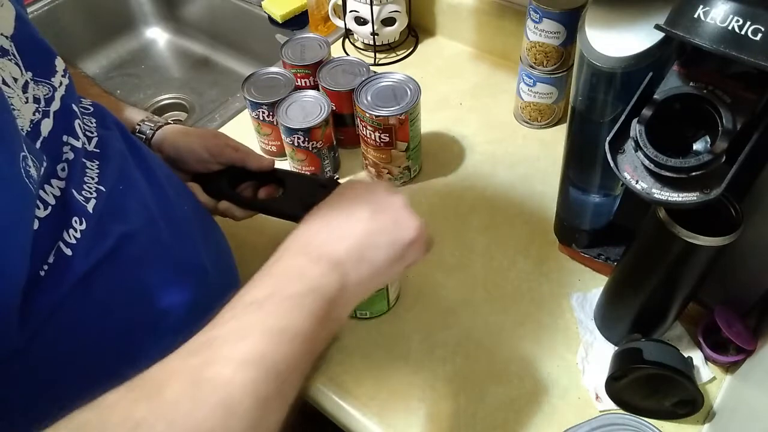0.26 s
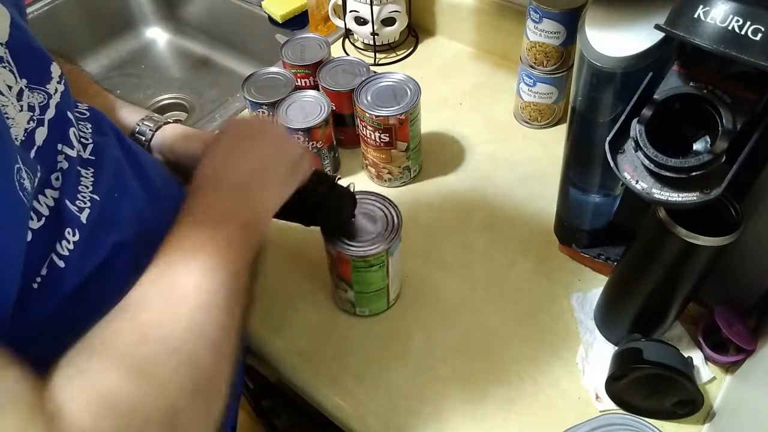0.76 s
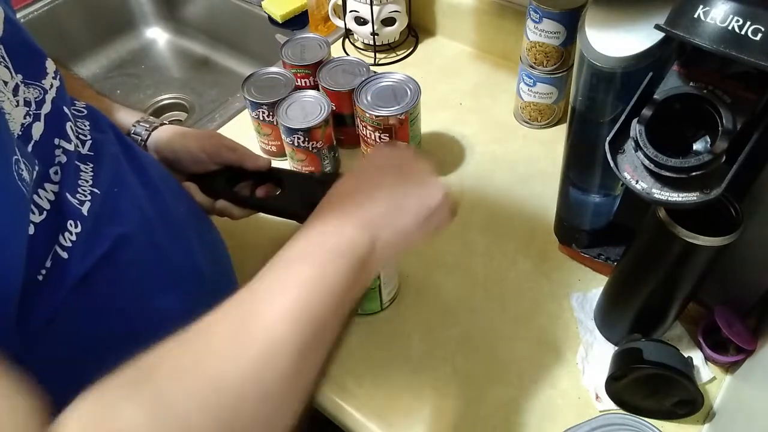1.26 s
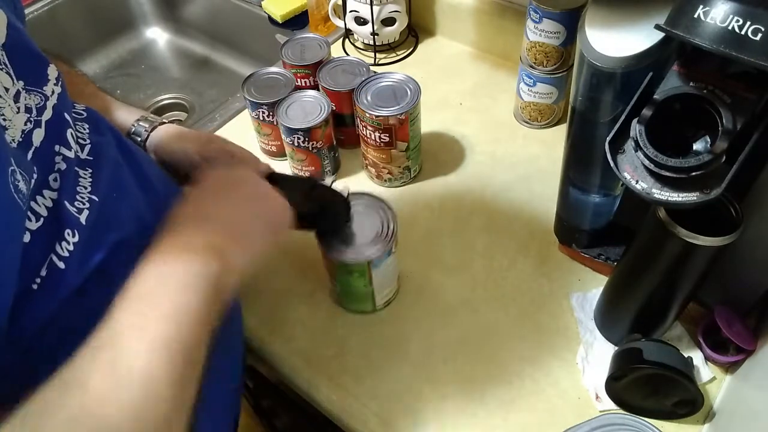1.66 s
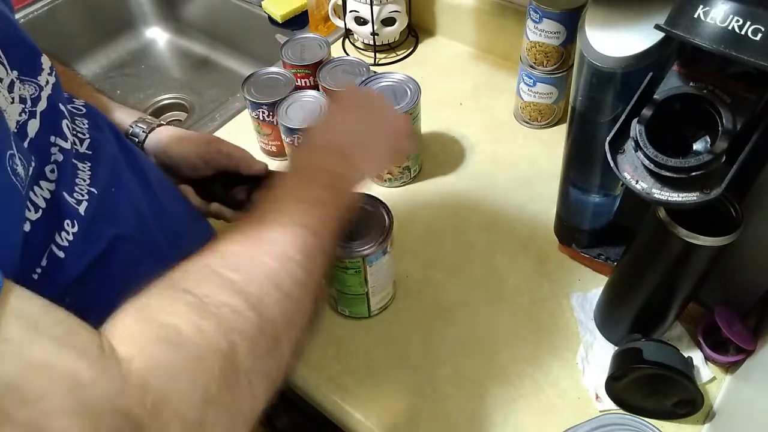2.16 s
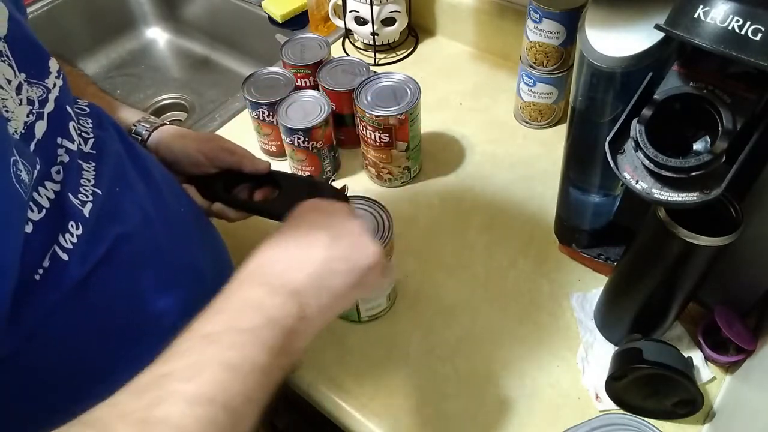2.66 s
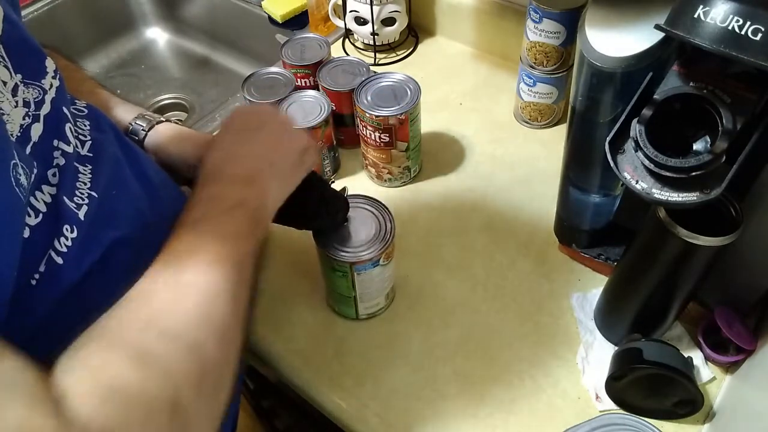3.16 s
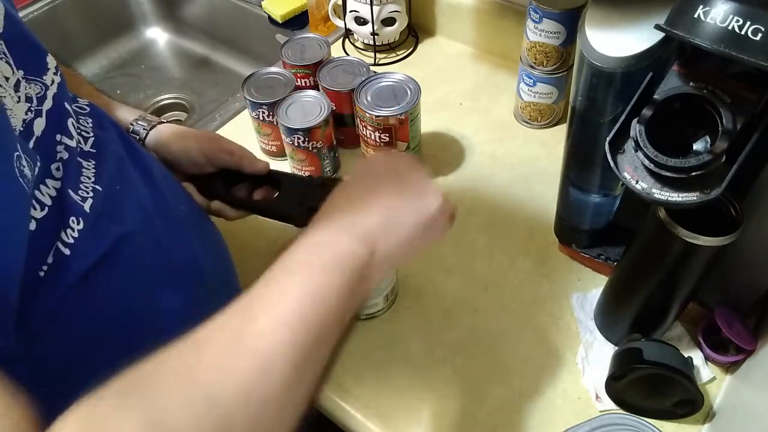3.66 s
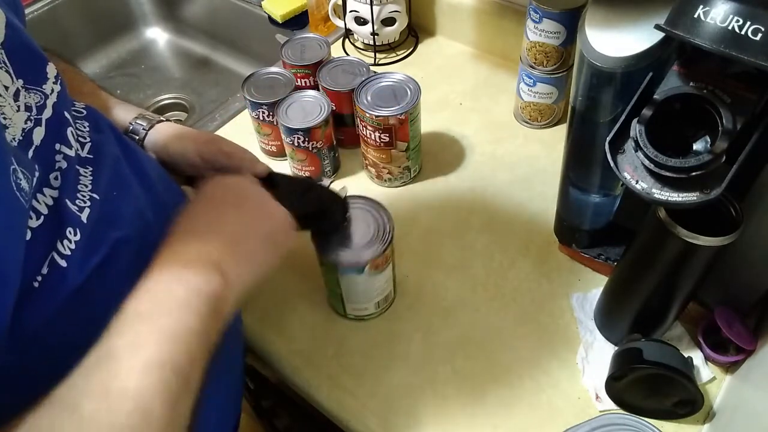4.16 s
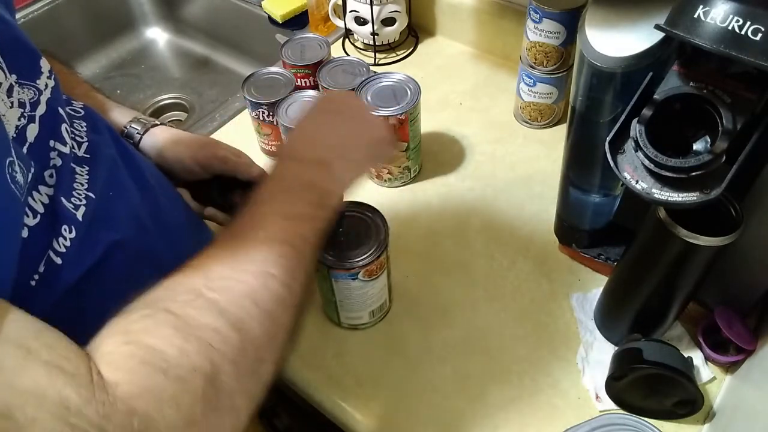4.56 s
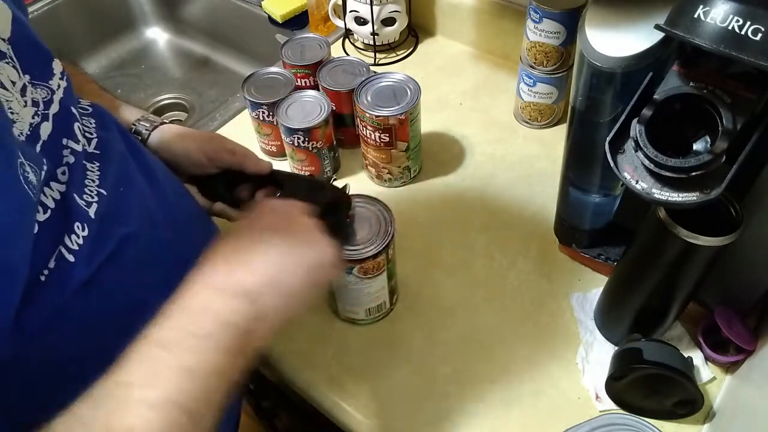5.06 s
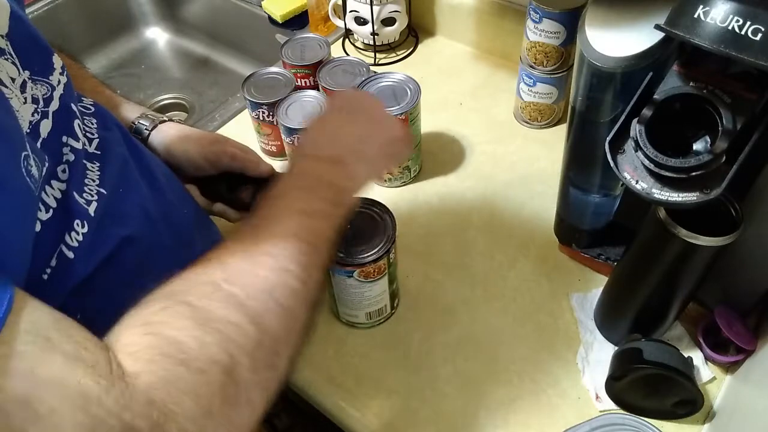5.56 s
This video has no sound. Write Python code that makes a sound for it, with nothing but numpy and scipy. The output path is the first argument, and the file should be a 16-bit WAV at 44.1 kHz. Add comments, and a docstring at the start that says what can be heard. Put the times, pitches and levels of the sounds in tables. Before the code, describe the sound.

Irregular clicks, scrapes and hollow thuds as a can is opened by hand on a kitchen counter, the lid cracking loose near the end.

```python
"""A hand-cranked opener works round a tin can on a counter, over still air, a faint hum and a whine.
From the start the can knocks (damped modes and low bursts), the wheels scrape (noise shaped by slips)
and the crank clicks (short noise bursts that ring the can wall); a thin hiss fades in the second second.
Near the end the lid gives way with a ringing crack and a hollow boom, and the cranking goes on.
A small hard room answers each contact with a second, slower decay."""
import sys
import numpy as np
from scipy import signal
from scipy.fft import rfft, irfft, next_fast_len
from scipy.io import wavfile
from scipy.ndimage import map_coordinates

SR = 44100
rng = np.random.default_rng(int(sys.argv[2]) if len(sys.argv) > 2 else 0)


def log_audio(samples):
    """Write samples as a 16-bit WAV file to the path given in sys.argv[1]."""
    # one column per channel
    frames = np.atleast_2d(samples).T
    # limit to full scale, then quantise
    limited = np.clip(frames, -1, 1)
    pcm = np.round(limited * 32767).astype(np.int16)
    wavfile.write(sys.argv[1], SR, pcm)


N = 256662  # length in samples
T = np.arange(SR // 2) / SR  # time since a contact, in seconds


def amp(db):
    """Level law: decibels to an amplitude ratio."""
    return 10 ** (np.asarray(db) / 20)


def unit(x):
    """Normalisation by mean power: scaled to rms 1."""
    return x / np.sqrt(np.mean(x ** 2) + 1e-20)


def unit_hit(x):
    """Normalisation by onset power: scaled to rms 1 over the first 25 ms."""
    return x / np.sqrt(np.mean(x[..., :SR // 40] ** 2) + 1e-20)


def decay(t60):
    """Exponential decay: the amplitude falls 60 dB in t60 seconds."""
    return amp(-60 * T / t60)


def along(points, hz):
    """Logarithmic frequency scale: (Hz, value) points interpolated along it."""
    f, v = np.transpose(points)
    return np.interp(np.log(hz + 1), np.log(f + 1), v)


def filtered(x, response):
    """Linear filtering: the spectrum of x times a response of frequency."""
    m = next_fast_len(x.shape[-1] + SR // 10)
    spectrum = rfft(x, m) * response(np.fft.rfftfreq(m, 1 / SR))
    return irfft(spectrum, m)[..., :x.shape[-1]]


def wobble(size, step):
    """Slow random variation: a smooth curve with a knot every step points."""
    knots = rng.standard_normal(int(size / step) + 4)
    return map_coordinates(knots, [np.arange(size) / step])


def uneven(x, ripple_db, width_hz):
    """Resonant colouring: each contact point favours other narrow resonances of the steel."""
    def response(hz):
        ripple = np.clip(wobble(len(hz), width_hz / hz[1]), -2, 2)
        return amp(ripple_db * ripple)
    return filtered(x, response)


# Likeness of the left and right channels.
# Each row: frequency in Hz, correlation from 0 to 1.
LIKENESS = [(100, 0.99), (250, 0.96), (500, 0.62), (1500, 0.19), (4000, 0.13), (12000, 0.027)]


def noise(colour, size, lo_hz=1, hi_hz=SR):
    """Diffuse sound: band-limited coloured noise, near mono in the bass and wide in the treble."""
    def response(hz):
        # mid and side gains cos and sin of this angle give the wanted correlation
        turn = np.arccos(np.clip(along(LIKENESS, hz), -1, 1)) / 2
        band = ((1 + (lo_hz / (hz + 1)) ** 10) * (1 + (hz / hi_hz) ** 10)) ** -.5
        return amp(along(colour, hz)) * band * [np.cos(turn), np.sin(turn)]
    mid, side = filtered(rng.standard_normal((2, size)), response)
    return unit(np.array([mid + side, mid - side]))


def burst(colour, lo_hz, hi_hz, attack, t60, room_db, room_t60, snap=0, snap_t60=0.0028):
    """Dense modes: a contact excites many at once, scattered by the counter, then by the room."""
    rise = 1 - np.exp(-T / attack)  # attack in seconds
    tail = np.hypot(decay(t60), amp(room_db) * decay(room_t60))  # powers add
    modes = uneven(noise(colour, len(T), lo_hz, hi_hz), 4, np.clip(lo_hz / 15, 45, 160))
    return unit_hit(modes * rise * (snap * decay(snap_t60) + tail))


def ring(modes, attack, centre_hz=1000, db_per_octave=0, spread=.6, waver=.4):
    """Modal superposition: damped modes, any slope centred on centre_hz, phases blurred by the grip."""
    hz, db, t60 = np.transpose(modes)[:, :, None]
    slope = db_per_octave * abs(np.log2(hz / centre_hz))
    level = db - slope + rng.normal(0, 2.05, hz.shape)
    # spread (radians) sets the channels apart; waver (radians) drifts with 70 knots a second
    phase = rng.uniform(0, 2 * np.pi, hz.shape) + spread * rng.standard_normal((2, *hz.shape))
    drift = waver * wobble(len(hz) * len(T), SR / 70).reshape(len(hz), -1)
    partials = amp(level) * decay(t60) * np.sin(2 * np.pi * hz * T + phase + drift)
    return unit_hit(partials.sum(axis=1) * (1 - np.exp(-T / attack)))


def add(track, s, sound):
    """Superposition: mixes a sound into the track at s seconds."""
    part = track[:, max(round(s * SR), 0):][:, :len(T)]
    part += sound[:, :part.shape[1]]


# Spectrum of the still air in the kitchen.
# Each row: frequency in Hz, relative level in dB.
AIR_COLOUR = [(15, -48.5), (25, -14), (97, -8.5), (373, -16.5), (503, -12), (591, -25), (840, -13),
              (936, -23), (3250, -26.5), (7310, -34), (12200, -32.5), (16000, -30.5)]


def kitchen(hum_hz=94.5, hum_db=-76, whine_hz=11908, whine_db=-95, air_db=-74):
    """Steady background: noise of still air, an appliance's hum and an electrical whine as pure tones."""
    def tone(hz, db):
        return amp(db) * np.sqrt(2) * np.sin(2 * np.pi * hz * np.arange(N) / SR)
    air = amp(air_db) * noise(AIR_COLOUR, N)
    return tone(hum_hz, hum_db) + tone(whine_hz, whine_db) + air


# Level of the thin high hiss, which swells and fades.
# Each row: time in seconds, level in dB.
HISS_LEVEL = [(0, -94), (.42, -69), (.55, -80.5), (1, -77.5), (1.25, -100)]


def hiss(centre_hz=11900, width_hz=1200):
    """Narrow-band noise: a resonance-shaped band under a slow envelope."""
    band = filtered(rng.standard_normal((2, N)), lambda hz: 1 / (1 + ((hz - centre_hz) / width_hz) ** 2))
    level_db = np.interp(np.arange(N) / SR, *np.transpose(HISS_LEVEL))
    return amp(level_db) * unit(band)


# The hand's push on the crank, which sets the rumble, the scrape and the stray ticks.
# Each row: time in seconds, effort in dB.
PUSH = [(0, -69), (.4, -64.5), (.7, -63.5), (1.12, -69), (1.63, -63), (1.9, -64.5), (2.15, -75.5),
        (2.3, -64.5), (2.58, -61.5), (2.95, -69), (3.62, -68.5), (4.2, -76.5), (4.62, -66.5), (4.85, -59),
        (5.36, -62.5), (5.82, -61.5)]


def effort(s):
    """Common driving force: the push on the crank in dB at the given times."""
    return np.interp(s, *np.transpose(PUSH))


# The blade bites into the tin and grinds.
# Each row: time in seconds, level added to the scrape at the height of the bite in dB.
BLADE_BITES = [(.41, 8), (1.86, 16.5), (2.69, 5), (4.96, 6.5), (5.23, 5.5)]
# Spectrum of the wheels scraping on the rim.
# Each row: frequency in Hz, relative level in dB.
SCRAPE_SPECTRUM = [(210, -26), (350, -14), (490, -3.5), (674, -13.5), (830, -6), (1110, -9), (2270, -14),
                   (2750, -16), (3280, -13), (7190, -25.5), (16000, -23)]
# Spectrum of the gripped can moving on the counter.
# Each row: frequency in Hz, relative level in dB.
GRIP_SPECTRUM = [(21, -55), (35, -22), (51, -6.5), (92, 1.5), (287, -12), (379, -19.5), (463, -15),
                 (674, -25.5), (700, -21), (910, -56), (1540, -120)]


def cranking(rumble_db=0.5, scrape_db=-8, bite_s=0.05, bite_rumble=0.39,
             slips_per_s=110, slip_spread_db=5, slip_t60=0.13):
    """Friction by random slips: the wheels creep along the rim while the gripped can rumbles."""
    now = np.arange(N) / SR
    # each bite is a bell of half width bite_s; the share bite_rumble of its dB reaches the rumble
    bite_db = sum(db * np.exp(-((now - s) / bite_s) ** 2) for s, db in BLADE_BITES)
    slip_size = amp(slip_spread_db * np.clip(rng.standard_normal(N), -2, 2))
    slips = (rng.random(N) < slips_per_s / SR) * slip_size
    slip_power = signal.fftconvolve(slips ** 2, decay(slip_t60) ** 2)[:N]
    grain = unit(np.sqrt(abs(slip_power)))
    scrape = amp(scrape_db + bite_db) * grain * noise(SCRAPE_SPECTRUM, N)
    rumble = amp(rumble_db + bite_rumble * bite_db) * noise(GRIP_SPECTRUM, N)
    return amp(effort(now)) * (scrape + rumble)


# The wheel skids on the rim.
# Each row: start in seconds, length in seconds, level in dB, brightness in dB per octave.
WHEEL_SKIDS = [(0.335, 0.049, -57.5, -6.5), (.413, .025, -60.5, 4), (0.484, .017, -61.5, 5.5),
               (.653, 0.024, -59.5, -.5), (1.417, 0.039, -71, 2), (1.717, .013, -53.5, -3),
               (1.81, 0.045, -60, -5), (1.855, .017, -53.5, -3), (1.886, .028, -56, -0.5),
               (2.493, .008, -58, 1), (3.22, .016, -68, -1.5), (3.805, .017, -63.5, -4),
               (3.875, .016, -66, 1), (4.235, 0.011, -51.5, 4.5), (4.301, 0.034, -56, -3.5),
               (4.325, .027, -56.5, -5.5), (4.409, 0.027, -62.5, -3.5), (5.25, 0.029, -65, -1.5)]


def skids(slips_per_s=450, slip_spread_db=5, slip_t60=0.0098, room_db=-15, room_t60=0.21):
    """Stick-slip friction: each skid is a swell of tiny jerks of steel on tin."""
    out = np.zeros((2, N))
    answer = decay(slip_t60) ** 2 + (amp(room_db) * decay(room_t60)) ** 2
    for s, length, db, tilt_db in WHEEL_SKIDS:
        force = np.sin(np.pi * np.minimum(T / length, 1))
        jerk_size = amp(slip_spread_db * rng.standard_normal(len(T)))
        slips = (rng.random(len(T)) < slips_per_s / SR) * jerk_size + 0.028  # over a steady glide
        grain = np.sqrt(abs(signal.fftconvolve((force * slips) ** 2, answer)[:len(T)]))
        steel = filtered(noise(SCRAPE_SPECTRUM, len(T)), lambda hz: amp(tilt_db * np.log2(1 + hz / 700)))
        add(out, s, amp(db) * unit_hit(grain * uneven(steel, ripple_db=1, width_hz=160)))
    return out


# Spectrum of steel snapping on steel.
# Each row: frequency in Hz, relative level in dB.
CLICK_SPECTRUM = [(180, -47), (300, 1), (470, 9), (645, -12), (801, 11.5), (930, -20), (1100, -4.5),
                  (1250, -2), (1510, 2), (1900, -14.5), (2790, -10), (6000, -18), (7320, -22.5),
                  (15000, -16.5), (16000, -21.5)]


def click(body_db, treble_db):
    """Impact of stiff bodies: steel parts snap together in three bands, the body fading slowest."""
    body = burst(CLICK_SPECTRUM, 350, 2700, attack=0.0023, t60=0.083, room_db=-13, room_t60=0.23)
    crack = burst(CLICK_SPECTRUM, 1939, 6700, attack=0.00065, t60=0.034, room_db=-10, room_t60=0.15,
                  snap=0.77)
    tick = burst(CLICK_SPECTRUM, 5000, 15000, attack=0.00053, t60=0.058, room_db=-15.0, room_t60=0.19,
                 snap=0.95)
    return amp(-11.0) * (amp(body_db) * body + crack + amp(treble_db + 1) * tick)


def stray_ticks(ticks_per_s=3, tick_db=-2):
    """Random impacts: the gears tick at chance moments, louder under a harder push."""
    out = np.zeros((2, N))
    for place in rng.random(round(ticks_per_s * N / SR)):
        s = place * N / SR
        add(out, s, amp(effort(s) + tick_db) * click(body_db=-8, treble_db=-0.5))
    return out


# The distinct clicks of the crank and wheels.
# Each row: start in seconds, level in dB, body and treble settings in dB against the crack.
CRANK_CLICKS = [(.519, -54, 3, -24), (0.6144, -61.5, -12, 0), (0.6966, -32.5, -.5, -3.5),
                (.9457, -61, -20, 0), (1.053, -61.5, -13, -3), (1.703, -53, 5.5, -7),
                (1.736, -37.5, -1.5, -6), (1.8139, -43, -17, -27), (1.8763, -40.5, -5, -1),
                (1.933, -54, -23, 7), (2.0018, -56.5, 3, -5), (2.4113, -56.5, 8.5, -18),
                (2.4405, -52.5, 2.5, -11), (2.499, -40.5, -3.5, -3.5), (3.017, -33.5, -14, -2.5),
                (3.071, -44, -17, -7.5), (3.1007, -43.5, -3.5, -14), (4.0628, -34.5, -6.5, -2),
                (4.1804, -59.5, -12, -7), (4.2429, -39, 2, -4), (4.3095, -40, 0.5, -11.5),
                (4.567, -53.5, 1.5, -5), (4.7287, -48, -2, -4.5), (4.82, -53, -1, 0.5), (4.869, -58, -7, 3),
                (4.9416, -47, 8, 0), (5.0729, -45.5, 6.5, -10.5), (5.4777, -57, -9, -9),
                (5.552, -48.5, -8, -4.5), (5.6315, -57, 2.5, 1), (5.6885, -59, 3.5, -3),
                (5.796, -56.5, 11.5, 0.5)]


def clicks():
    """Impact sequence: the crank and wheels click in their play."""
    out = np.zeros((2, N))
    for s, db, body_db, treble_db in CRANK_CLICKS:
        add(out, s, amp(db) * click(body_db, treble_db))
    return out


# Modes of the can wall.
# Each row: frequency in Hz, relative level before slope and scatter in dB, decay time t60 in seconds.
WALL_MODES = [(413, 1, 0.27), (497.8, 10, 0.17), (1042, -0.5, 0.1), (1170, 0.5, 0.087), (1365, -3, 0.066),
              (1520, -3.5, 0.081), (1860, -8, 0.1), (2103, -6.5, 0.16), (2440, -8.5, 0.22), (3560, -5, .14),
              (3810, -5, .1)]
# Modes of the crank.
# Each row: frequency in Hz, relative level before scatter in dB, decay time t60 in seconds.
CRANK_MODES = [(837, -4.5, 0.16), (1136, 3, 0.14), (2740, -8, 0.07), (2784, -3.5, 0.074),
               (3337, -10.5, 0.12), (5410, -27, 0.049)]
# The crank strikes the end of its play.
# Each row: start in seconds, level in dB.
STOPS = [(1.737, -58.5), (3.016, -38.5), (3.101, -50), (4.243, -54)]


def ringing(wall_db=-14.5, wall_hz=1450):
    """Modal response: the can wall rings in proportion to each click, the crank at each stop."""
    out = np.zeros((2, N))
    for s, db, _, _ in CRANK_CLICKS:
        wall = ring(WALL_MODES, attack=0.0007, centre_hz=wall_hz, db_per_octave=11.0, spread=0.83, waver=0.41)
        add(out, s, amp(db + wall_db) * wall)
    for s, db in STOPS:
        add(out, s, amp(db) * ring(CRANK_MODES, attack=0.0022, spread=0.79, waver=0.35))
    return out


# The can knocks on the counter.
# Each row: start in seconds, level in dB, favoured pitch of the body in Hz,
# boom and clack settings in dB.
CAN_KNOCKS = [(.145, -52.5, 220, -10, -14), (.213, -50, 305, -8, -12.5), (.336, -29, 205, -5, -12.5),
              (.394, -37.5, 200, -4.5, -22), (.425, -39.5, 198, -17, -10.5), (.489, -51, 490, -9, -4),
              (.656, -46, 504, -7, -8.5), (.711, -42, 180, -13, -13), (1.306, -46.5, 214, -16, -16.5),
              (1.417, -31.5, 210, -15.5, -13.5), (1.478, -42, 202, -25, -11.5), (1.736, -45, 142, -2, -2.5),
              (1.839, -34.5, 179, -8.5, -14), (1.893, -38, 175, -11, -10.5), (2.007, -48, 180, -9, -11),
              (2.342, -48, 222, -19.5, -10), (2.595, -26.5, 248, -19, -13), (2.636, -36, 180, -10.5, -16.5),
              (3.016, -42, 170, -11.5, 3.5), (3.074, -40, 145, -12.5, -6.5), (3.83, -37.5, 285, -10.5, -13),
              (3.906, -33.5, 245, -13.5, -13), (4.09, -38.5, 164, -14.5, -14),
              (4.236, -43.5, 435, -14, -8.5), (4.305, -41, 249, -14.5, 0.5), (4.413, -47.5, 145, -22, -16),
              (4.83, -35, 145, -10, -15), (4.877, -37, 297, -8, -16), (4.944, -29.5, 174, -7.5, -16),
              (5.07, -27, 300, -29, -15.5), (5.796, -41.5, 200, -7.5, -12)]
# Modes of the can standing on the counter.
# Each row: frequency in Hz, relative level before slope and scatter in dB, decay time t60 in seconds.
COUNTER_MODES = [(143.2, 1, 0.15), (186.2, -2.5, 0.19), (213.9, 2, 0.16), (253, -2.5, 0.083),
                 (302.8, 3, 0.12), (354, -15, 0.18), (414, -5.5, 0.3), (505, 0, 0.17)]
# Spectrum of the can meeting the counter.
# Each row: frequency in Hz, relative level in dB.
KNOCK_SPECTRUM = [(24, -43.5), (40, -25), (85, 11), (150, -14.5), (210, -4.5), (306, -11.5), (561, -21),
                  (836, -20), (1930, -35.5), (2150, -33.5), (3000, -42), (6000, -51.5), (7800, -71),
                  (13200, -120)]


def knocks(boom_hz=92.6, boom_t60=0.19, touch_lead=.003):
    """Impact on a plate: the slab booms, the can thuds and its bottom rim clacks."""
    out = np.zeros((2, N))
    slab = np.sin(2 * np.pi * boom_hz * T) * decay(boom_t60) * (1 - np.exp(-T / 0.0018))
    slab = unit_hit(slab)
    for s, db, centre_hz, boom_db, clack_db in CAN_KNOCKS:
        low = burst(GRIP_SPECTRUM, 55, 140, attack=0.0038, t60=0.16, room_db=-7.5, room_t60=0.42)
        boom = amp(boom_db + 3) * (slab + amp(-3.5) * low)
        body = ring(COUNTER_MODES, attack=0.0029, centre_hz=centre_hz, db_per_octave=11.0,
                    spread=0.13, waver=0.26)
        thud = burst(KNOCK_SPECTRUM, 134, 600, attack=0.0031, t60=0.078, room_db=-10.5, room_t60=0.42)
        clack = burst(KNOCK_SPECTRUM, 617, 7800, attack=0.0034, t60=0.13, room_db=-17.5, room_t60=0.55)
        knock = boom + amp(-4.5) * body + amp(-8.0) * thud + amp(clack_db) * clack
        add(out, s - touch_lead, amp(db - 7.0) * knock)
    return out


# Modes of the lid as it gives way.
# Each row: frequency in Hz, relative level before scatter in dB, decay time t60 in seconds.
LID_MODES = [(342.5, -4, 0.22), (507, -2, 0.31), (647, 3, .19), (650, 6, 0.098), (719, 6, 0.14),
             (835, -1, 0.23), (1144, -9, .14), (1856, -3, 0.14), (1884, -17, 0.12), (2270, -13, 0.31),
             (3180, 0.5, 0.15), (3290, -2, 0.12), (4440, -16, 0.12), (4880, 0, 0.064), (6400, -23, .12)]
# Spectrum of the snapping lid.
# Each row: frequency in Hz, relative level in dB.
SNAP_SPECTRUM = [(120, -39), (200, -14), (735, -3.5), (1000, -14), (1840, -7), (2250, -14), (3250, -8),
                 (3830, -17), (4950, -17), (7270, -30.5), (16000, -25)]


def lid(s=5.1265, db=-36, crack_db=-33, hollow_db=-40, thump_db=-44, hollow_lag=.016):
    """Sudden release of strain: the lid cracks and rings, and the can booms hollowly behind it."""
    out = np.zeros((2, N))
    crack = burst(SNAP_SPECTRUM, 410, 17000, attack=0.0014, t60=0.043, room_db=-17.5, room_t60=0.27)
    thump = burst(KNOCK_SPECTRUM, 153, 450, attack=0.002, t60=0.32, room_db=-4, room_t60=0.35)
    hollow = burst(SNAP_SPECTRUM, 420, 710, attack=0.0055, t60=0.14, room_db=-13.5, room_t60=0.34)
    add(out, s, amp(db) * ring(LID_MODES, attack=.0008, spread=0.47, waver=0.37))
    add(out, s, amp(crack_db) * crack)
    add(out, s, amp(thump_db) * thump)
    add(out, s + hollow_lag, amp(hollow_db) * hollow)
    return out


# Stereo balance.
# Each row: frequency in Hz, left minus right in dB.
BALANCE = [(120, 0), (250, -1.6), (500, -3), (1000, -3), (2500, -1.2), (8000, -2.3), (13000, 1.4)]


def scene():
    """Superposition of all sources, with level differences that place most of the range to the right."""
    background = kitchen() + hiss()
    friction = cranking() + skids()
    impacts = stray_ticks() + clicks() + ringing() + knocks() + lid()
    sound = background + friction + impacts
    return filtered(sound, lambda hz: amp(np.outer([.5, -.5], along(BALANCE, hz))))


def record(dry, bass_hz=48, top_hz=16000):
    """Band limitation: a high-pass thins the deep bass and a steep low-pass ends the treble."""
    thinned = signal.sosfilt(signal.butter(2, bass_hz, "high", fs=SR, output="sos"), dry)
    return filtered(thinned, lambda hz: 1 / (1 + (hz / top_hz) ** 120))


dry = scene()
out = record(dry)
log_audio(out)
```